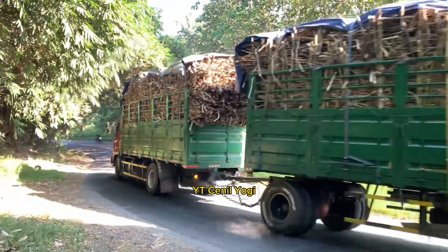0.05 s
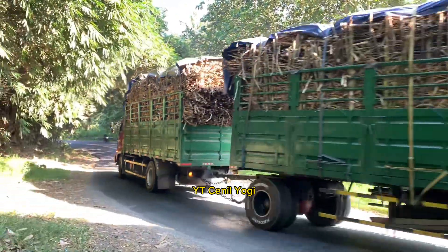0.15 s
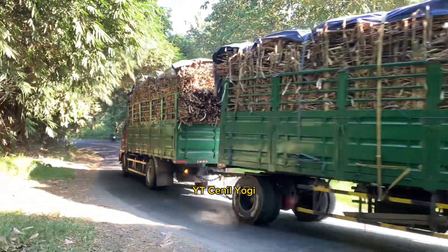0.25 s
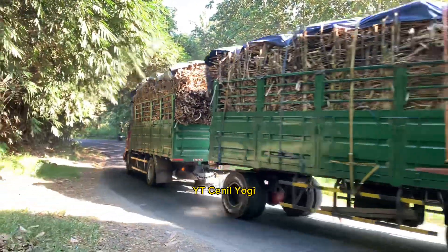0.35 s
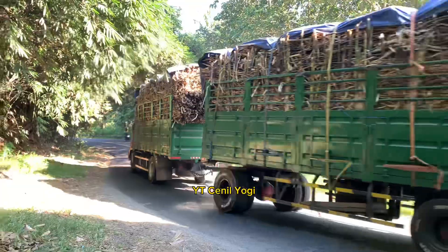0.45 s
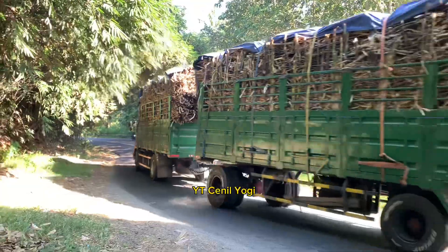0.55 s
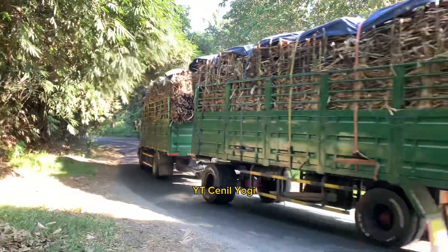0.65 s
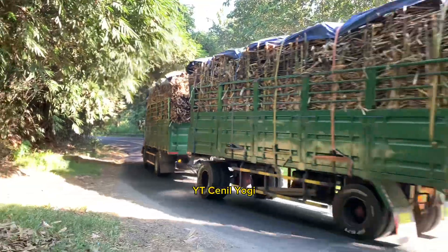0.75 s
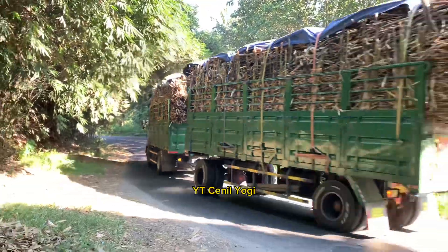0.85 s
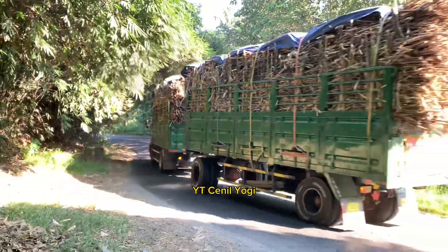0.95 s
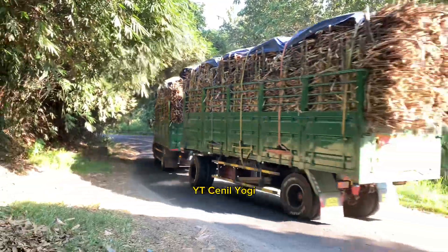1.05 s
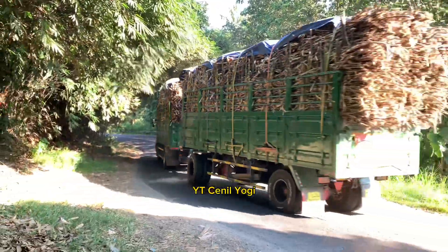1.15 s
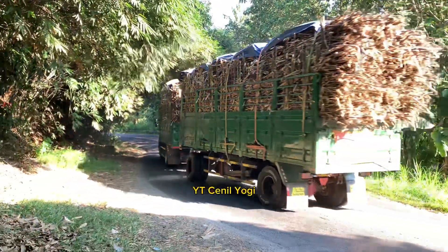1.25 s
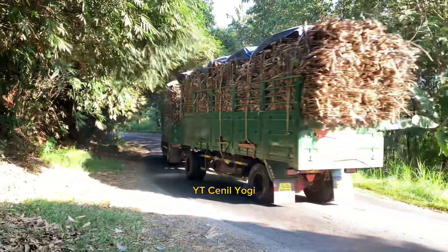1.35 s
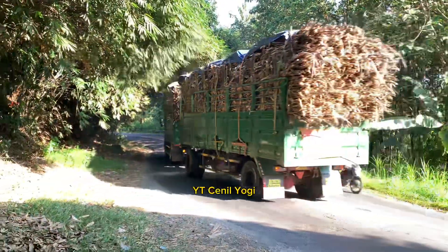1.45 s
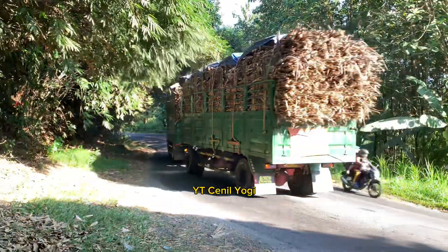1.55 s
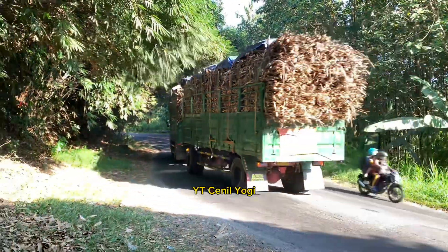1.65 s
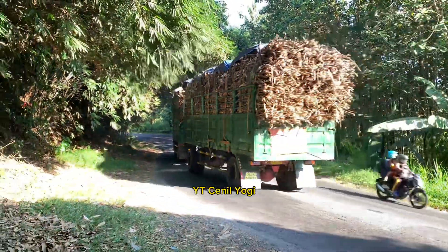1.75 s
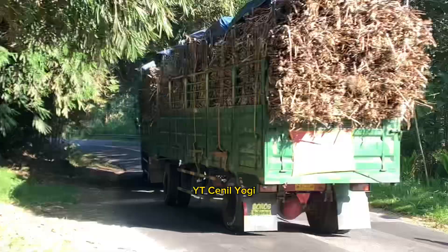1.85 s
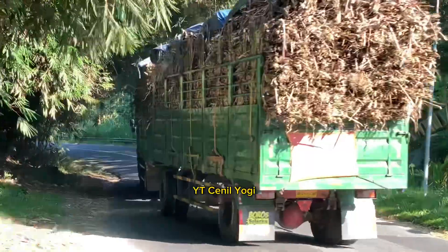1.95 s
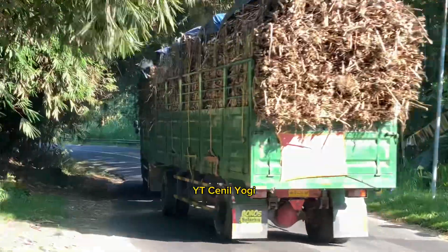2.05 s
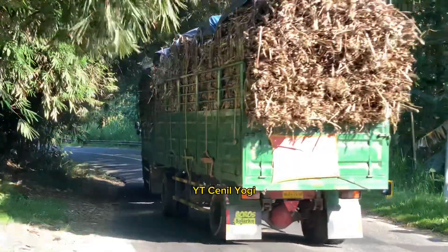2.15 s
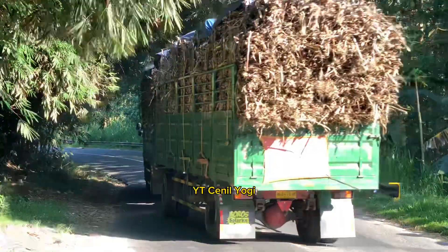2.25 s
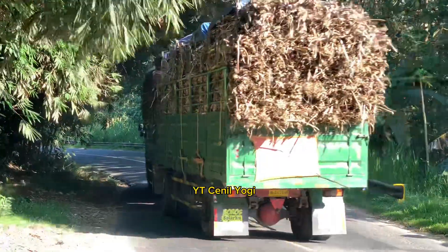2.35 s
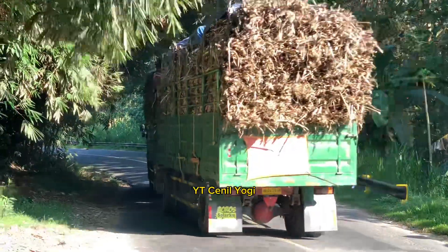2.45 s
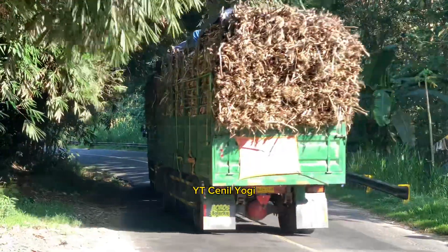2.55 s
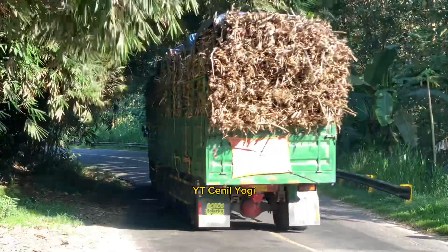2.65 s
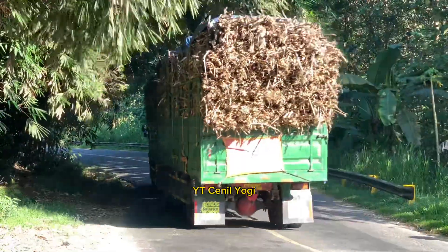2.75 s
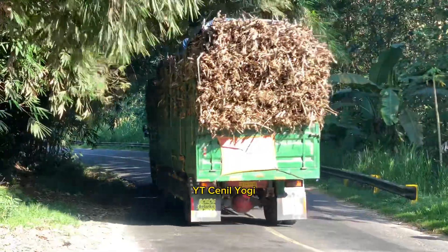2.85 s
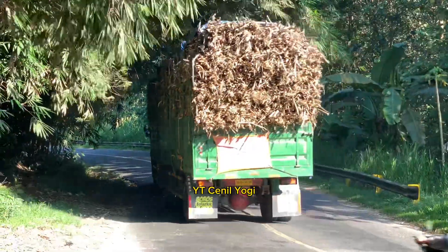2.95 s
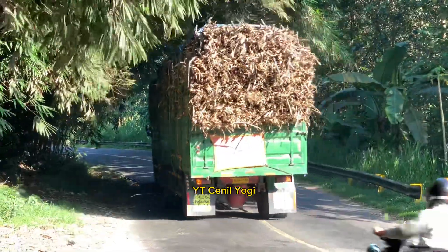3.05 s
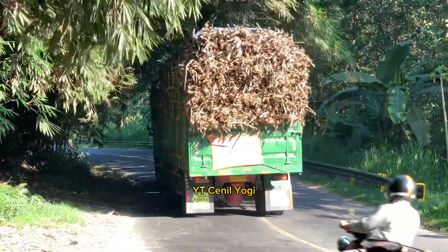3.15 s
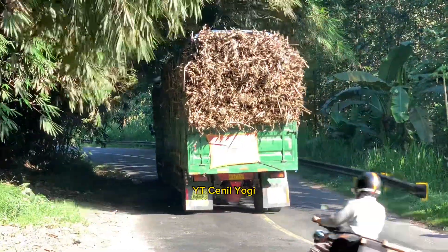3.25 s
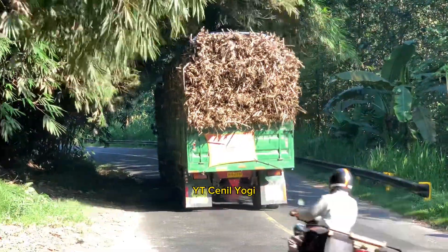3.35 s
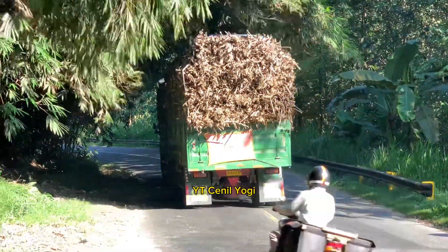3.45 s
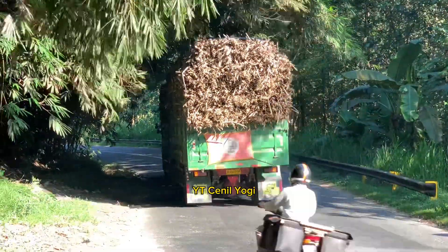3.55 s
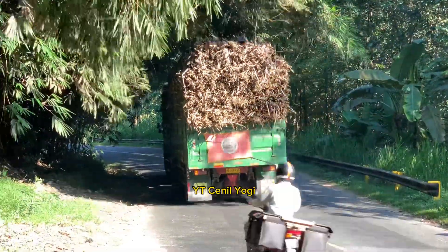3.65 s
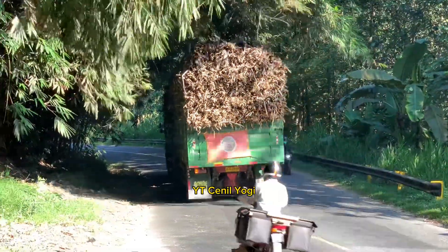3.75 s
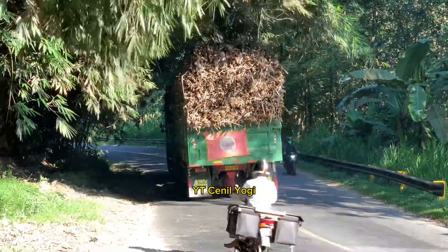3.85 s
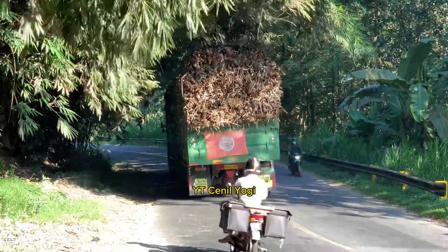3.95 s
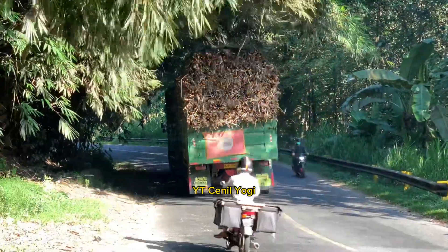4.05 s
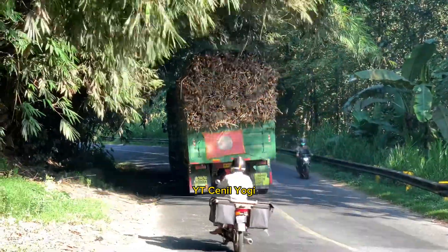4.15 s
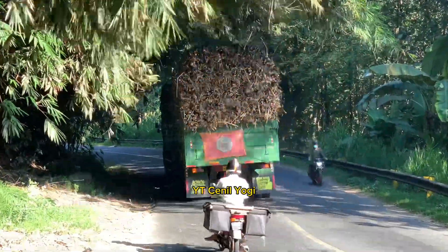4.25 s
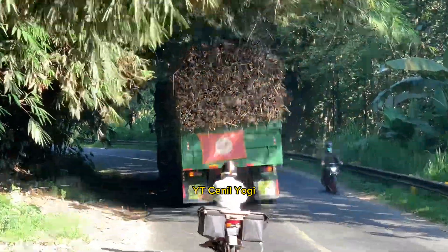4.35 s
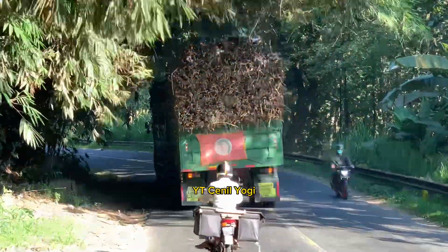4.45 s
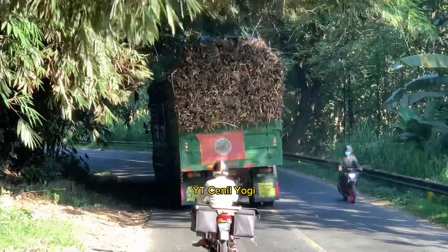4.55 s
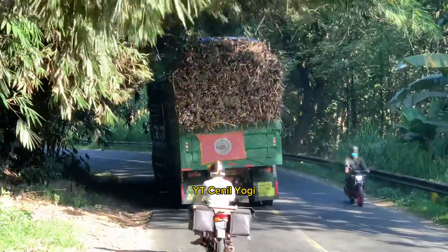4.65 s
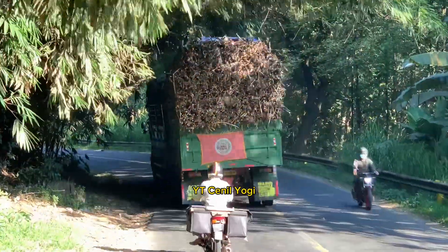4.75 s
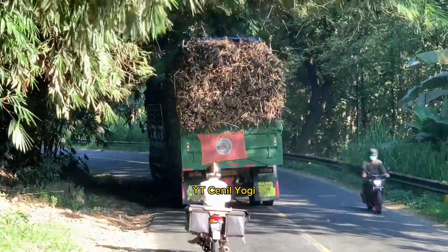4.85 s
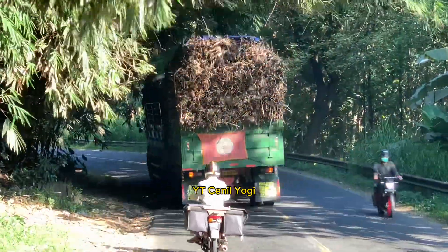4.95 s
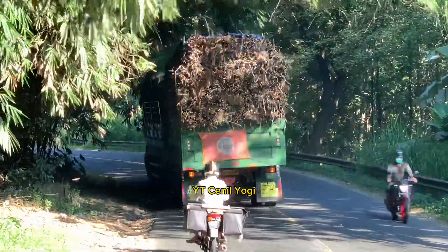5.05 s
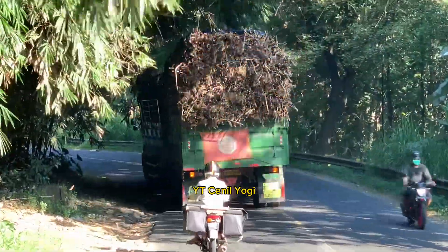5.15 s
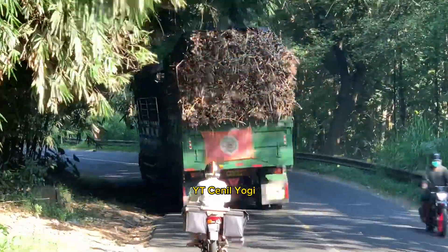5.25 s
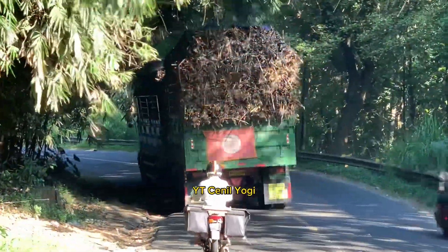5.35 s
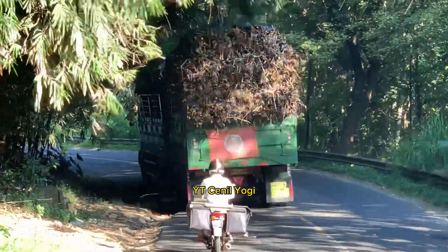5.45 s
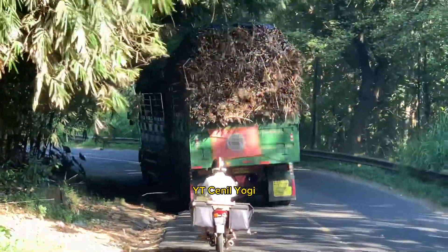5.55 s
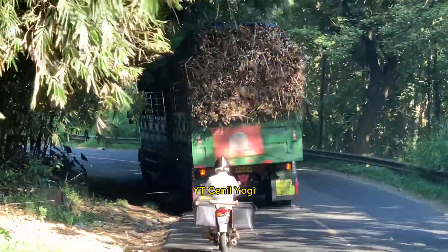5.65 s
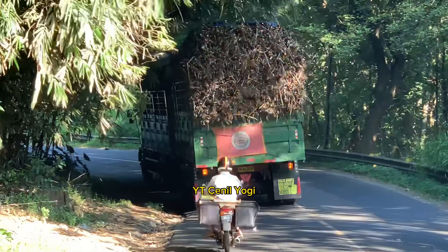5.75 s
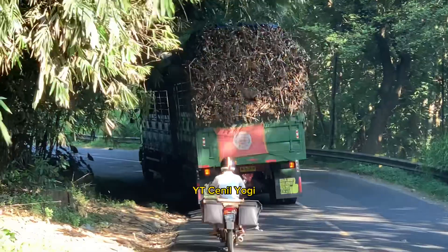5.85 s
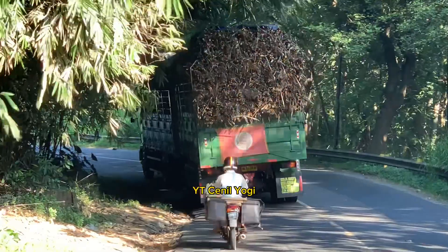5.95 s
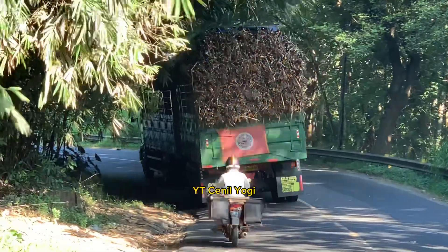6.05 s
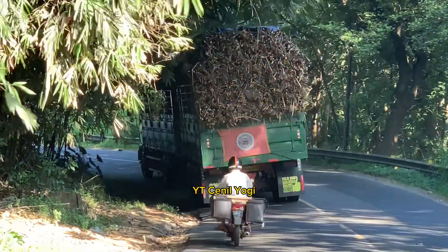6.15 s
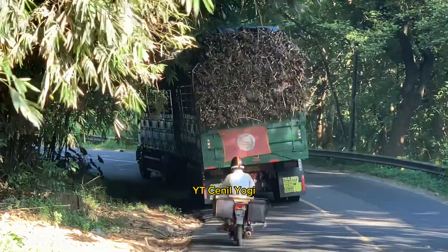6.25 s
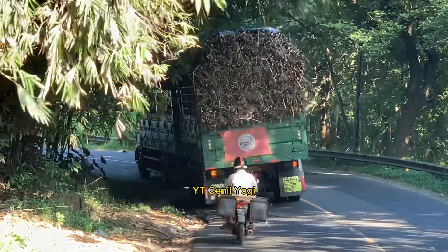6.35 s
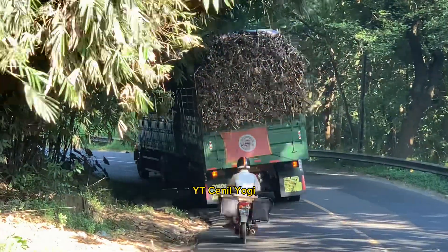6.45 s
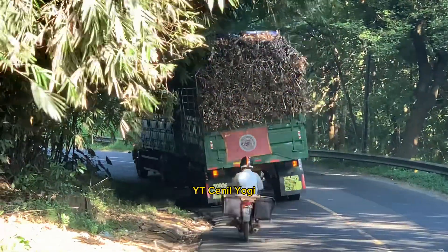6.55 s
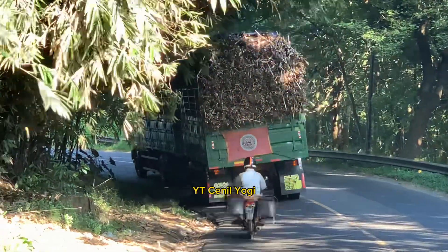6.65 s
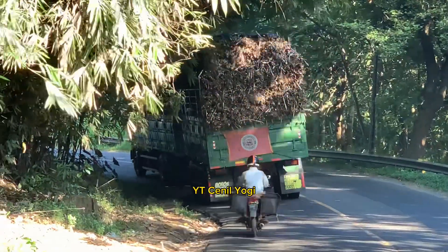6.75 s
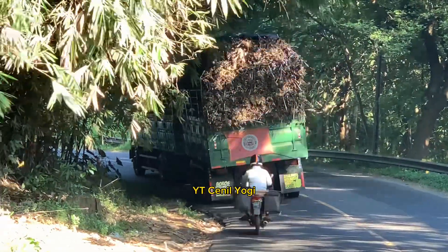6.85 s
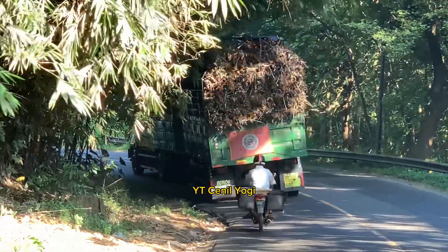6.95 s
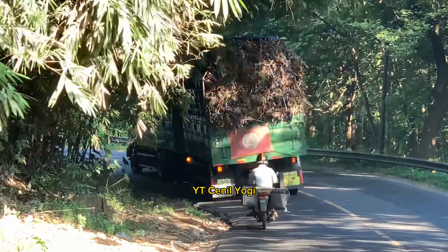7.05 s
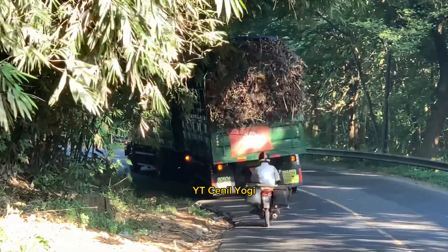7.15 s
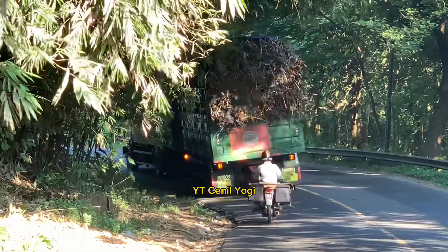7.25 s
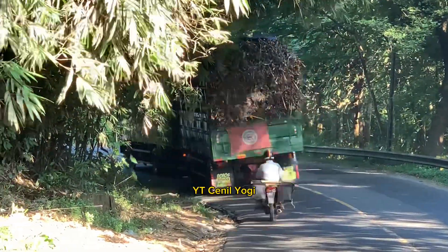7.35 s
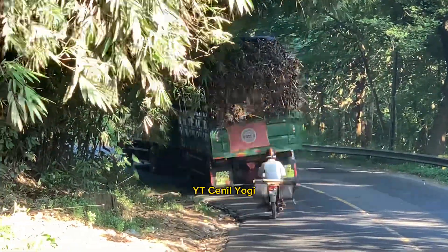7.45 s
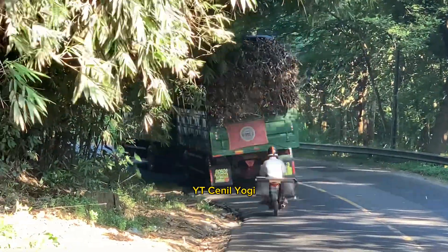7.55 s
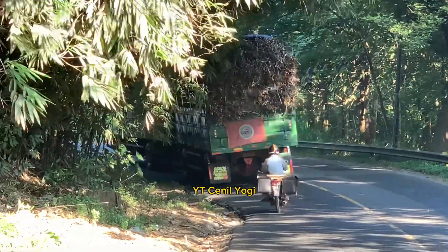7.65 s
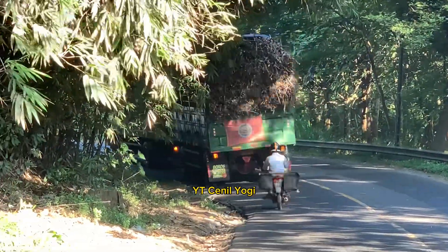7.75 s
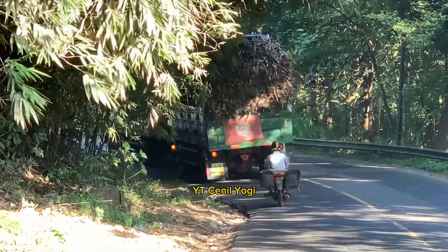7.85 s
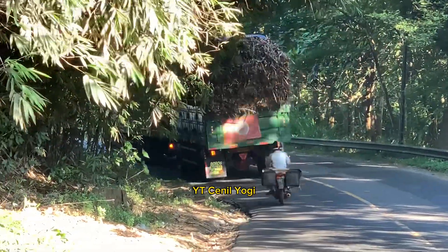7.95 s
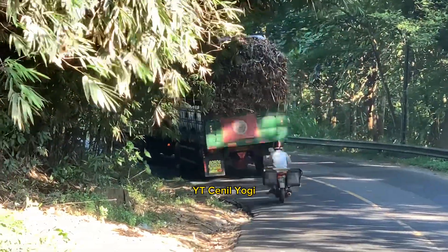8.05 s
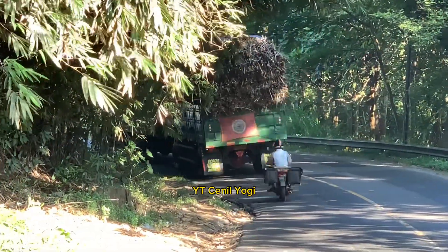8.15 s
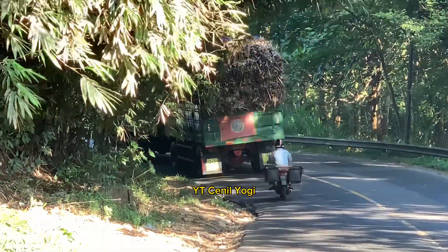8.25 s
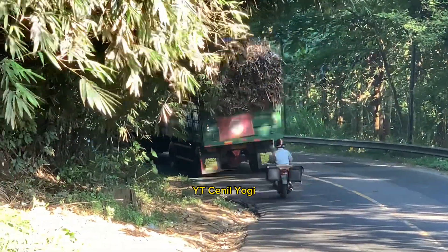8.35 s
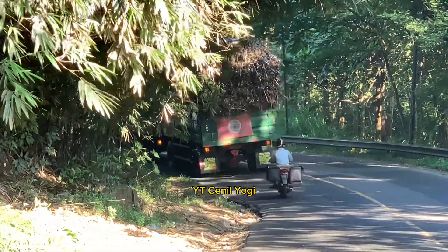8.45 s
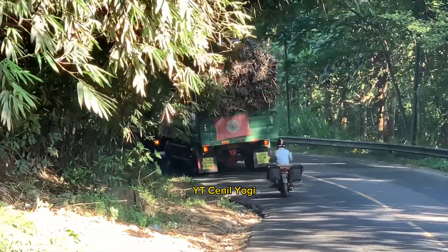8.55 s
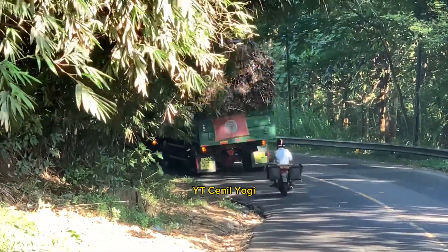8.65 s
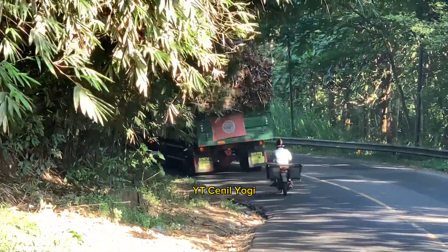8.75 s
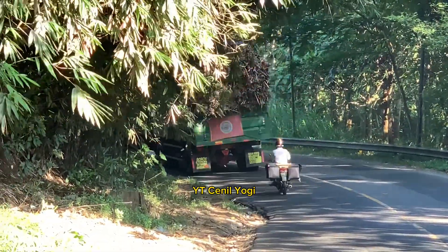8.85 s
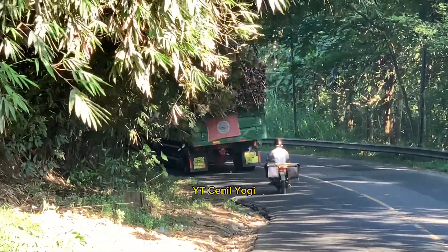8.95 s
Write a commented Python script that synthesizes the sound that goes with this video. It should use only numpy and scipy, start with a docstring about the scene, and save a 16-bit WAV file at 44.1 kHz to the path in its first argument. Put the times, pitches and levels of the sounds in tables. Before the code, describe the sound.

Close by a wooded roadside, a loaded diesel truck with a trailer labours away in low gear: deep exhaust boom, rough gear howl, knocking clatter, tyre rumble and hiss. Loose fittings clink. About three seconds in, a small motorbike putters past with ticking valves and chain slaps. A second truck's low note beats against the first, and late on a wheel squeals thinly. Outdoor stereo microphone, the truck steadily fading.

```python
"""By the roadside, a loaded four-cylinder diesel truck, just past and close, booms away up a wooded hill in low gear.
Firing lines make the exhaust and gear whine; shaped noise makes the knock, drive line, tyres and hillside.
A second truck ahead slowly starts to beat against the boom; loose fittings clink on the trailer.
A single-cylinder motorbike passes with firing lines and pulsed ticks; at last a wheel squeals in the bend.
Other engines carry as low notes. The camera's stereo processing crosses over the treble and limits the band."""
import sys
import numpy as np
from scipy import signal
from scipy.fft import rfft, irfft, next_fast_len
from scipy.io import wavfile
from scipy.ndimage import uniform_filter1d, map_coordinates

SR = 44100
rng = np.random.default_rng(int(sys.argv[2]) if len(sys.argv) > 2 else 0)


def file_out(sig):
    """Save sig as 16-bit WAV at sys.argv[1]."""
    # one column per channel
    cols = np.atleast_2d(sig).T
    # limit, then scale
    lim = np.clip(cols, -1, 1)
    pcm = np.round(lim * 32767).astype(np.int16)
    wavfile.write(sys.argv[1], SR, pcm)


N = 396459

# path of truck and trailer: time abreast, distance of the lane, road speed
ABREAST_S, LANE_M, TRUCK_M_PER_S = -0.91, 3.9, 3.07


def amp(db):
    """Decibels to gain."""
    return 10 ** (np.asarray(db) / 20)


def unit(x):
    """Scale to rms 1."""
    return x / np.sqrt(np.mean(x ** 2) + 1e-20)


def along(points, hz):
    """Read (Hz, value) points on a log frequency axis."""
    f, v = np.transpose(points)
    return np.interp(np.log(hz + 1), np.log(f + 1), v)


def curves(rows):
    """One value per sample for each column after the time."""
    s, *cols = np.transpose(rows)
    return [np.interp(np.arange(N) / SR, s, c) for c in cols]


def wobble(rate):
    """A smooth random curve, rate knots a second."""
    coarse = np.arange(0, N + 64, 64)
    knots = rng.standard_normal(2048)
    values = map_coordinates(knots, [coarse * rate / SR], mode="wrap")
    return np.interp(np.arange(N), coarse, values)


def filtered(x, response):
    """x through a response of frequency."""
    size = next_fast_len(N + SR // 4)
    spectrum = rfft(x, size) * response(np.fft.rfftfreq(size, 1 / SR))
    return irfft(spectrum, size)[..., :N]


def colour(points):
    """Response of a (Hz, dB) spectrum that falls away beyond its ends."""
    def response(f):
        above = 1 + (f / points[-1][0]) ** 10
        below = 1 + (points[0][0] / (f + 1)) ** 10
        return amp(along(points, f)) / np.sqrt(above * below)
    return response


def body(modes):
    """Causal response of (Hz, width in Hz, dB) resonances; dB is the power of each."""
    def response(f):
        total = 0
        for k, (c, w, db) in enumerate(modes):
            ring = 1j * f * w / (c * c - f * f + 1j * f * w)
            total = total + (-1) ** k * amp(db) / np.sqrt(w) * ring
        return total
    return response


def rush(response, gate=1):
    """Gated noise through a response, as (mid, side): bass lies near the centre, trees scatter the treble."""
    # Stereo spread. Each row: frequency in Hz, side minus mid in dB.
    spread = [(60, -15), (110, -19), (200, -12.5), (380, 0), (700, -0.5), (1290, 3.5), (2380, -1),
              (4400, -1), (8120, -0.5), (15000, 2.5)]
    # Likeness of the microphone's two ports a quarter cycle apart, left leading when positive.
    # Each row: frequency in Hz, share from -1 to 1.
    quarter_cycle = [(100, 0.52), (220, 0.63), (430, 0.046), (720, 0.64), (1100, 0.33), (1550, -0.73),
                     (1800, -0.55), (2100, -0.088)]

    def ports(f):
        skew = np.clip(along(quarter_cycle, f), -0.95, 0.95)
        width = amp(along(spread, f))
        rows = [np.ones(len(f)), 1j * skew * width, np.sqrt(1 - skew ** 2) * width]
        return np.array(rows) * response(f)
    noise = gate * rng.standard_normal((2, N))
    mid, shared, scattered = filtered(noise[[0, 0, 1]], ports)
    return np.array([mid, shared + scattered]) / np.std(mid)


def central(x, side_db):
    """A tone as (mid, side): it reaches the two ports slightly out of step."""
    return np.array([x, amp(side_db) * filtered(x, lambda f: 1j)])


def turns(hz):
    """Cycles completed at a changing rate."""
    return np.cumsum(hz) / SR


def strokes(cycles, decay, scatter_db):
    """A burst at the start of each cycle, each of a new size; decay is a share of the cycle."""
    sizes = amp(scatter_db * rng.standard_normal(4096))
    return unit(sizes[cycles.astype(int)] * np.exp(-(cycles % 1) / decay))


def lines(cycles, orders, waver_db, waver_rate, jitter_hz=0):
    """Exhaust lines that follow the firing, each wavering in level and pitch in its own way."""
    jitter_rate = 30  # new values a second
    total = 0
    for k, db in orders:
        level = amp(db + waver_db * wobble(waver_rate))
        drift = turns(jitter_hz * wobble(jitter_rate)) + rng.random()
        total = total + level * np.sin(2 * np.pi * (k * cycles + drift))
    return total


def patchy(x, depth_db):
    """Shifting reflections strengthen and weaken patches of the spectrum."""
    z = signal.stft(x, nperseg=1024)[2]
    field = uniform_filter1d(rng.standard_normal(z.shape[1:]), size=3, axis=0)
    field = uniform_filter1d(field, size=9, axis=1)
    return signal.istft(z * amp(depth_db * unit(field)))[1][:, :N]


def impacts(rows, t60, crest_db):
    """Envelope of (seconds, peak dB) contacts that die away; their rms lies crest_db under the peak."""
    t = np.arange(N) / SR
    return sum(amp(db - crest_db - 60 * np.abs(t - s) / t60) * (t >= s) for s, db in rows)


def distance_db(abreast_s, lane_m, m_per_s):
    """Level of something driving past, in dB relative to its loudest moment (0 or below)."""
    metres = np.hypot(lane_m, m_per_s * (np.arange(N) / SR - abreast_s))
    return 20 * np.log10(metres.min() / metres)


def swell(s, half_s):
    """A smooth rise to 1 at time s, and the fall after it."""
    return np.exp(-((np.arange(N) / SR - s) / half_s) ** 2)


def hillside():
    """Fluttering road and engine noise thrown back by the wooded slope."""
    # Spectrum coming off the slope. Each row: frequency in Hz, relative level in dB per Hz.
    slope = [(45, -2), (62, 10.5), (200, -6.5), (450, -8), (900, -9.5), (1400, -18.5), (1900, -17),
             (2500, -18.5), (4500, -19.5), (6300, -50), (9500, -41.5), (13500, -28), (15000, -39)]
    flutter = amp(1.16 * wobble(80))
    return amp(-40.5 + 0.38 * wobble(2.4)) * patchy(rush(colour(slope), flutter), depth_db=2.5)


def traffic(truck_hz):
    """The truck ahead fires slower and beats against the near one; of other engines only a low note carries."""
    # Truck ahead. Each row: time in seconds, Hz by which it fires slower than the near truck, level in dB.
    ahead = [(3.2, 3.585, -48), (4.5, 3.585, -35), (5.3, 3.585, -33.5), (5.95, 7.4, -32.5),
             (6.35, 6.3, -35), (7, 9.3, -33.5), (7.35, 8.3, -37), (7.8, 11.6, -33.5), (8.3, 9.3, -30),
             (9, 9.4, -31)]
    # Other engines going by. Each row: middle in seconds, half length in seconds, firing rate in Hz, level in dB.
    passers = [(2.298, 0.95, 76.3, -31.5), (5.3, 0.47, 72, -42), (6.796, 0.76, 60.1, -34)]
    doppler = 0.0258  # share by which their pitch is raised coming and lowered going
    slower_hz, ahead_db = curves(ahead)
    angle = 2 * np.pi * turns(truck_hz - slower_hz)
    notes = amp(ahead_db + 1.4 * wobble(4.2)) * (np.sin(angle) + amp(-23.5) * np.sin(2 * angle))
    for s, half_s, hz, db in passers:
        bend = 1 - doppler * np.tanh((np.arange(N) / SR - s) / half_s)
        pitch = hz * bend + 1.37 * wobble(7.8)
        level = amp(db + 3.0 * wobble(7.6)) * swell(s, half_s)
        notes = notes + level * np.sin(2 * np.pi * turns(pitch))
    return central(np.sqrt(2) * notes, side_db=-22)


def motorbike_exhaust(hz, firing):
    """Multiples of the single cylinder's firing rate, shaped by the silencer."""
    # Motorbike silencer. Each row: frequency in Hz, gain in dB.
    silencer = [(60, 1.5), (85, -5), (120, -9), (150, -3.5), (183, -0.5), (215, -15.5), (300, -15),
                (350, -19), (425, -6), (480, -12)]
    total = 0
    for k in range(2, 13):
        line = lines(firing, [(k, 0)], waver_db=1.4, waver_rate=5, jitter_hz=1.3)
        total = total + amp(along(silencer, k * hz)) * line
    return total


def valve_ticks(firing):
    """A tick at every crank turn, swelling quickly and dying away; the one on the firing stroke is harder."""
    crank = 2 * firing
    rise = 1 - np.exp(-(crank % 1) / 0.08)
    harder = amp(2.0 * (firing % 1 < .5))
    return unit(rise * strokes(crank, decay=0.19, scatter_db=1.0) * harder)


def motorbike():
    """One cylinder putters, tyres rush, valve gear ticks each crank turn with a few much harder ticks, and the
    chain rings against its guard."""
    # The ride. Each row: time in seconds, firing rate in Hz, throttle in dB.
    ride = [(0, 29.15, -6), (2.7, 29, 3), (3.3, 29.7, 0.5), (3.52, 30.1, -0.5), (3.88, 31.1, -2),
            (5.7, 32, -1), (7.3, 37.1, -4.5), (8.4, 38.3, 7.5), (9, 39.1, 7)]
    # Engine case and chain guard ringing. Each row: centre in Hz, width in Hz, relative power in dB.
    case = [(1650, 160, -6), (3200, 300, -5), (3880, 130, -3), (6780, 160, -4), (7500, 400, -8),
            (10500, 1600, -4), (13400, 1500, -1.5)]
    # Chain guard alone. Each row: centre in Hz, width in Hz, relative power in dB.
    guard = [(3910, 690, 10), (6650, 190, -8)]
    # Hardest valve ticks, in step with the tick train. Each row: time in seconds, peak in dB.
    hard_tick_rows = [(3.1391, -34), (3.4419, -31), (3.5087, -26), (3.5426, -31), (3.7232, -27), (3.836, -29),
                      (3.9323, -28), (3.9804, -28)]
    # Tyres on the asphalt. Each row: frequency in Hz, relative level in dB per Hz.
    asphalt = [(500, -5), (1000, -11), (1400, -7), (4500, -9), (8000, -6), (14000, -18)]
    abreast_s, lane_m, m_per_s = 3.37, 2.76, 5.5
    tick_lag_s = 0.15  # the open side of the engine faces the roadside just after it has passed
    fires_s = 3.5087  # the moment of one firing
    # base level abreast in dB, and dB lost for each dB of distance
    putter_db, putter_fall = -31.5, 0.83
    tick_db, tick_fall = -50, 2.3
    chain_db, chain_fall = -55, 1.7
    tyre_db, tyre_fall = -49, 1.14
    # the chain drags along the guard: middle, half length, level
    drag_s, drag_half_s, drag_db = 3.63, 0.13, -50.5

    hz, throttle_db = curves(ride)
    away_db = distance_db(abreast_s, lane_m, m_per_s)
    engine_db = distance_db(abreast_s + tick_lag_s, lane_m, m_per_s)
    firing = turns(hz)
    firing = firing + 1 - firing[round(fires_s * SR)] % 1
    putter = amp(putter_db + putter_fall * away_db + throttle_db) * motorbike_exhaust(hz, firing)
    ticks = amp(tick_db + tick_fall * engine_db) * rush(body(case), valve_ticks(firing))
    drag = amp(chain_db + chain_fall * engine_db) + amp(drag_db) * swell(drag_s, drag_half_s)
    chain = drag * rush(body(guard), strokes(2 * firing, decay=1, scatter_db=0.7))
    tyres = amp(tyre_db + tyre_fall * away_db) * rush(colour(asphalt))
    struck = 0.73 * rush(body(case)) + 0.75 * rush(body(guard))
    hard_ticks = impacts(hard_tick_rows, t60=0.04, crest_db=9) * struck
    return central(putter, side_db=-23) + patchy(ticks + chain + hard_ticks + tyres, depth_db=1.5)


def wheel_squeal():
    """A wheel rubs in the bend: four close, unsteady tones in a narrow rasp, over a lower scrape."""
    # Each row: start in seconds, length in seconds, level at full rise in dB.
    rubs = [(6.62, 0.46, -55), (7.0, 0.98, -55)]
    # Each row: middle pitch in Hz, relative level in dB.
    squeal_tones = [(4215, -7), (4280, 3), (4355, 0), (4575, -10)]
    rise_s, fall_s = 0.44, 0.21
    tones = 0
    for hz, db in squeal_tones:
        pitch = hz + 10 * wobble(8.5) + 45 * wobble(220)
        tones = tones + amp(db) * np.sin(2 * np.pi * turns(pitch))
    rasp = rush(lambda f: body([(4400, 480, 0)])(f) ** 2)
    scrape = rush(body([(1970, 180, 0)]))
    t = np.arange(N) / SR
    rub = 0
    for s, length, db in rubs:
        ramp = np.minimum((t - s) / rise_s, (s + length - t) / fall_s)
        rub = rub + amp(db) * np.clip(ramp, 0, 1)
    return rub * amp(1.5 * wobble(70)) * (central(tones, side_db=-7) + 0.66 * rasp + 0.99 * scrape)


def trailer():
    """Heavy tyres rumble and hiss; the steel frame rings, loose fittings clink and the dry cane load rustles."""
    # Tyre rumble. Each row: frequency in Hz, relative level in dB per Hz.
    rumble_spectrum = [(20, -38), (42, -8), (51, -4.5), (72, 1), (120, -6), (165, -7), (220, -12),
                       (260, -20.5), (310, -24.5), (500, -31)]
    # Each row: time in seconds, rumble level in dB.
    rumble_level = [(0, -29), (1.4, -28), (2.4, -28), (4, -29), (5.4, -29), (7, -30.5), (9, -30)]
    # Tyre hiss. Each row: frequency in Hz, relative level in dB per Hz.
    hiss_spectrum = [(3000, -13), (6000, .5), (7800, -1), (10000, -2), (13300, -1.5), (14200, -4),
                     (15000, -17)]
    # Loose fittings. Each row: time in seconds, peak in dB.
    clink_rows = [(2.8544, -40), (2.8986, -39), (3.9903, -35), (5.0968, -42), (5.2241, -45), (5.7594, -43)]
    # The cane load. Each row: middle in seconds, half length in seconds, level in dB.
    rustles = [(0.264, 0.025, -53), (1.066, 0.044, -51), (2.02, 0.022, -49), (2.885, 0.025, -50),
               (7, 0.22, -57)]
    # Dry cane. Each row: frequency in Hz, relative level in dB per Hz.
    cane_spectrum = [(5000, -5), (9500, 0), (14000, -6)]
    # base level at the start in dB, and dB lost for each dB of distance
    frame_db, frame_fall = -47.5, 0.85
    hiss_db, hiss_fall = -55.5, 0.53

    away_db = distance_db(ABREAST_S, LANE_M, TRUCK_M_PER_S)
    rumble = amp(curves(rumble_level)[0] + 1.1 * wobble(12.0)) * rush(colour(rumble_spectrum))
    hiss_level = amp(hiss_db + hiss_fall * away_db + 0.54 * wobble(9))
    hiss = hiss_level * rush(colour(hiss_spectrum), amp(1.8 * wobble(200)))
    metal = colour([(3500, -6), (7300, 2), (10000, -3), (13000, 1), (15000, -6)])
    clinks = impacts(clink_rows, t60=0.11, crest_db=4.5) * rush(metal)
    frame_level = amp(frame_db + frame_fall * away_db + 2.0 * wobble(22))
    frame = frame_level * rush(body([(4690, 105, 0)]))
    stirring = sum(amp(db) * swell(s, half_s) for s, half_s, db in rustles)
    cane = stirring * rush(colour(cane_spectrum), amp(2.7 * wobble(400)))
    return rumble + hiss + clinks + frame + cane


def firing_rate():
    """Engine speed in Hz: the trailer tugs and the engine surges with the load."""
    # Near truck. Each row: time in seconds, firing rate in Hz.
    speed = [(0, 100.3), (0.27, 98.4), (0.5, 102.2), (1.05, 101.9), (1.5, 101), (2.2, 102.2), (3.1, 103.6),
             (4.8, 106.8), (5.7, 107.3), (6.5, 107.4), (7.2, 105.8), (7.9, 106), (9, 104.1)]
    # One column: crest of each surge in seconds.
    tugs = [0, 0.53, 1.07, 1.88, 2.42, 2.95, 3.6, 4.33, 4.8, 5.28, 5.72, 6.23, 6.75, 7.45, 8, 8.6, 9.1]
    surge_hz = 1.0
    tug = np.interp(np.arange(N) / SR, tugs, np.arange(len(tugs)))
    return curves(speed)[0] + surge_hz * np.cos(2 * np.pi * tug) + 0.15 * wobble(7)


def gear_whine(hz):
    """Rough engine lines a quarter of the firing rate apart sing out as they near the gearbox's howl."""
    # Centre of the gear howl. Each row: time in seconds, frequency in Hz.
    howl = [(0, 730), (0.3, 647), (0.7, 720), (1.15, 712), (1.7, 720), (2.2, 690), (2.72, 724), (3, 714),
            (3.6, 698)]
    width_hz, jitter_hz = 36, 17
    howl_hz, = curves(howl)
    total = 0
    for k in np.arange(25, 31) / 4:
        cycles = turns(k * hz + jitter_hz * wobble(70))
        rough = lines(cycles, [(1, 0)], waver_db=4.0, waver_rate=45)
        total = total + rough / (1 + ((k * hz - howl_hz) / width_hz) ** 2)
    return 0.85 * total


def truck_exhaust(firing, away_db):
    """Boom at the firing rate with its octave, and weaker lines of unequal cylinders."""
    # Each row: time in seconds, boom level in dB, octave level in dB.
    exhaust_levels = [(0, -10, -34), (0.5, -13.5, -27.5), (0.85, -10.5, -29), (1.15, -12.4, -30),
                      (1.5, -19, -26.5), (1.75, -18, -28.5), (2.15, -15, -37), (3.1, -17, -31),
                      (3.7, -16.5, -32), (4.5, -21.5, -32), (5.9, -22.5, -31.5), (6.6, -24.5, -35.5),
                      (7, -25, -43), (7.45, -34, -46.5), (7.95, -26.5, -41.5), (9, -35, -53)]
    # Weaker lines. Each row: multiple of the firing rate, relative level in dB.
    pipe_orders = [(0.751, -44), (1.25, -31), (1.5, -28), (1.752, -34), (2.25, -28), (2.75, -40.5),
                   (3, -31.5), (3.5, -33.5), (4, -37), (6, -42.5)]
    pipe_db, pipe_fall = -5, 1.19  # gain at the start in dB, dB lost for each dB of distance
    jitter_hz = 2.5  # uneven burning shakes each line
    boom_db, octave_db = curves(exhaust_levels)
    angle = 2 * np.pi * firing
    # both lines crest together at each puff, so the pressure peaks are pointed
    boom = amp(boom_db + 1.04 * wobble(12)) * np.sin(angle)
    octave = amp(octave_db + 1.16 * wobble(14)) * np.cos(2 * angle)
    pipe = lines(firing, pipe_orders, waver_db=3.5, waver_rate=14, jitter_hz=jitter_hz)
    pipe = amp(pipe_db + pipe_fall * away_db) * pipe
    return central(np.sqrt(2) * (boom - octave) + pipe, side_db=-18)


def truck(hz):
    """Exhaust, gear howl, drive line and clatter, and combustion knock ringing the block."""
    # Drive line. Each row: frequency in Hz, relative level in dB per Hz.
    drive_spectrum = [(150, 0), (260, 2.5), (360, -3), (450, -7), (540, -11.5), (620, -14), (820, -12.5),
                      (1050, -10.5), (1350, -23.5), (2200, -25)]
    # Engine clatter. Each row: frequency in Hz, relative level in dB per Hz.
    clatter_spectrum = [(900, -12), (1400, -8.5), (1850, 4), (2200, -5.5), (2700, -1.5), (3300, -1.5),
                        (4100, -6), (5200, -5.5), (6500, -11.5), (9000, -8)]
    # Engine block. Each row: centre in Hz, width in Hz, relative power in dB.
    block = [(2490, 230, -4.5), (3116, 115, -1.5), (3355, 250, 2), (4690, 99, -5), (5260, 270, -12.5),
             (6330, 350, -10.5)]
    # Gearbox housing. Each row: centre in Hz, width in Hz, relative power in dB.
    gearbox = [(694, 61, -2), (1047, 160, -10.5)]
    # The engine shows through gaps in the chassis. Each row: middle in seconds, half length in seconds,
    # gear howl gain in dB, block rasp gain in dB.
    gaps = [(0.268, 0.094, 1.5, 3), (0.8, 0.3, 2, 2), (1.35, 0.44, 3, 1), (2.72, 0.035, 7, 0),
            (2.874, 0.078, 6, -1), (3.353, 0.054, 5, 0), (3.765, 0.055, 5, -1)]
    # base level at the start in dB, and dB lost for each dB of distance
    drive_db, drive_fall = -30.5, 1
    howl_db, howl_fall = -39.5, 1.35
    rasp_db, rasp_fall = -41.5, 1.14
    clatter_db, clatter_fall = -38.5, 0.73

    away_db = distance_db(ABREAST_S, LANE_M, TRUCK_M_PER_S)
    howl_level = howl_db + howl_fall * away_db + sum(db * swell(s, half_s) for s, half_s, db, _ in gaps)
    rasp_level = rasp_db + rasp_fall * away_db + sum(db * swell(s, half_s) for s, half_s, _, db in gaps)
    firing = turns(hz)
    # four cylinders knock unevenly in turn, one harder than the rest
    uneven = firing + 0.14 * wobble(50)
    every = strokes(uneven, decay=0.41, scatter_db=7)
    hardest = strokes(firing / 4, decay=0.49, scatter_db=4)
    knock = 2.5 + 0.35 * every + 0.12 * hardest
    gears = amp(howl_level) * (rush(body(gearbox)) + central(gear_whine(hz), side_db=-24))
    rasp = amp(rasp_level + 1.7 * wobble(28)) * rush(body(block), knock)
    clatter_level = amp(clatter_db + clatter_fall * away_db + 0.22 * wobble(4.5))
    clatter = clatter_level * rush(colour(clatter_spectrum), knock)
    drive_level = amp(drive_db + drive_fall * away_db + 0.17 * wobble(6.3))
    drive = drive_level * rush(colour(drive_spectrum), knock)
    return truck_exhaust(firing, away_db) + gears + patchy(rasp + clatter + drive, depth_db=1.62)


def scene():
    """All sources, from mid and side to left and right."""
    # Balance of the two sides. Each row: frequency in Hz, left minus right in dB.
    lean = [(100, .5), (200, -0.5), (700, 2), (1290, 3.5), (2400, 1.4), (8000, 0)]
    truck_hz = firing_rate()
    background = hillside() + traffic(truck_hz)
    mid, side = background + motorbike() + wheel_squeal() + trailer() + truck(truck_hz)
    return filtered(np.array([mid + side, mid - side]), lambda f: amp(np.outer([.5, -.5], along(lean, f))))


def record(dry):
    """The camera feeds each port's treble, slightly late, to the other channel and cuts all above its band limit."""
    # Stereo processing. Each row: frequency in Hz, share fed to the other channel.
    crossfeed = [(6800, 0), (8400, 1)]
    cross_delay_s, top_hz = 0.000295, 15650
    port_gap_db = 5  # the right port's lead in treble level, before the crossfeed

    def direct(f):
        share = along(crossfeed, f)
        ports = amp(np.outer([-.5, .5], port_gap_db * share))
        return ports / np.sqrt(np.mean(ports ** 2, axis=0) * (1 + share ** 2))

    def late(f):
        return along(crossfeed, f) * np.exp(-2j * np.pi * f * cross_delay_s)
    own = filtered(dry, direct)
    crossed = filtered(own[::-1], late)
    return filtered(own + crossed, lambda f: f < top_hz)


dry = scene()
out = record(dry)
file_out(out)
```